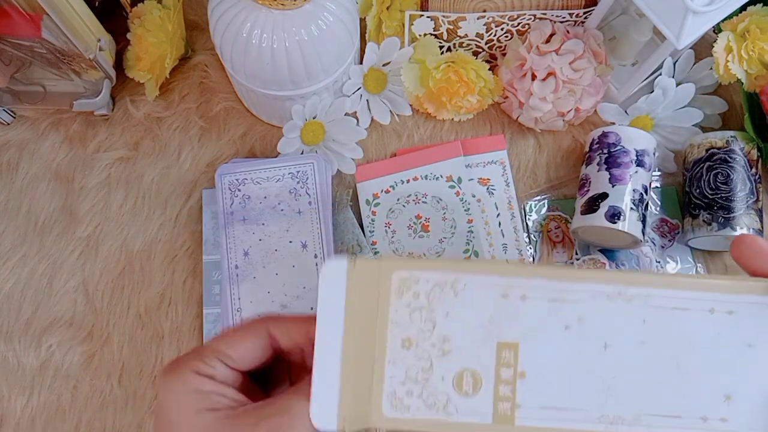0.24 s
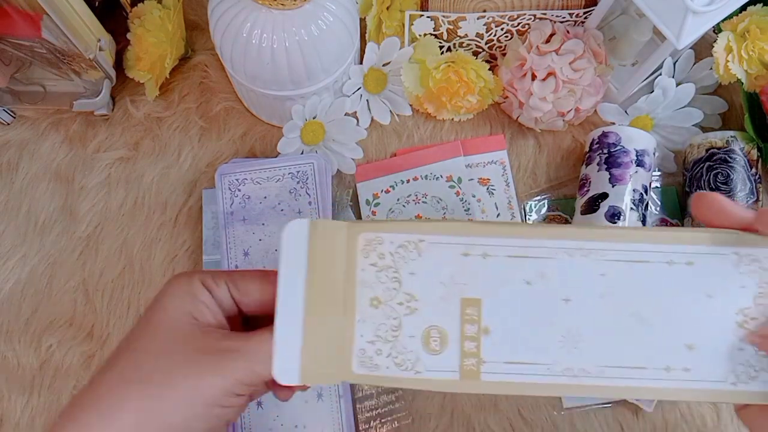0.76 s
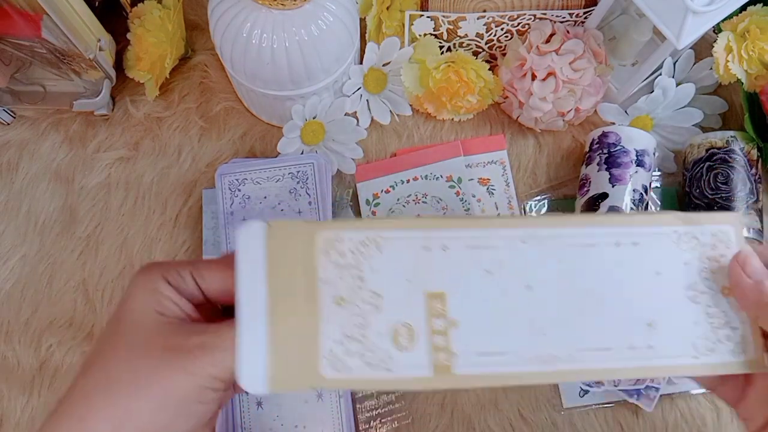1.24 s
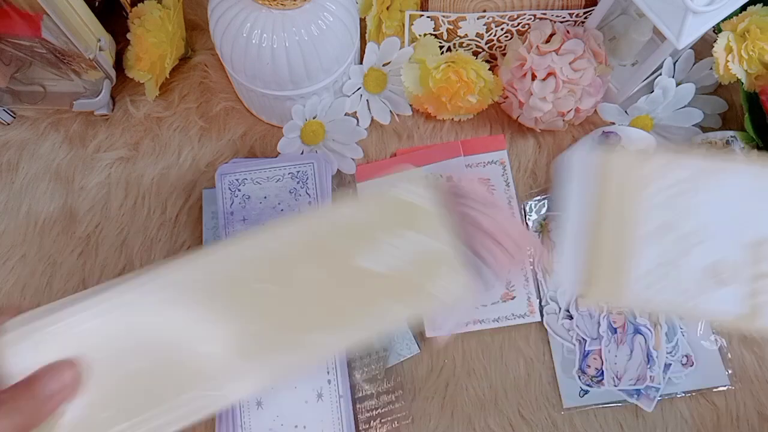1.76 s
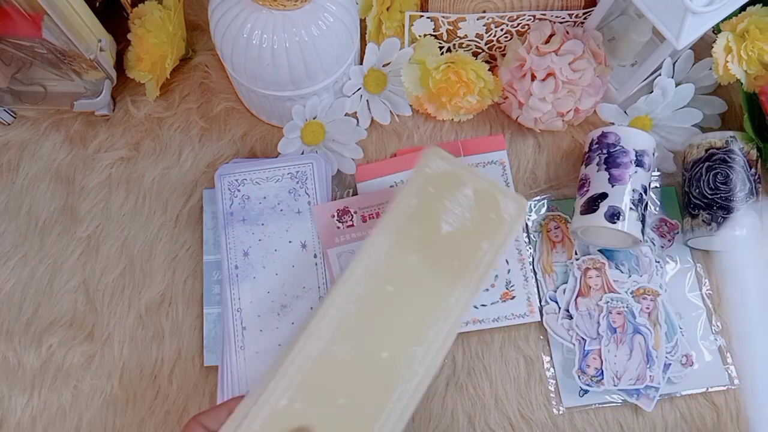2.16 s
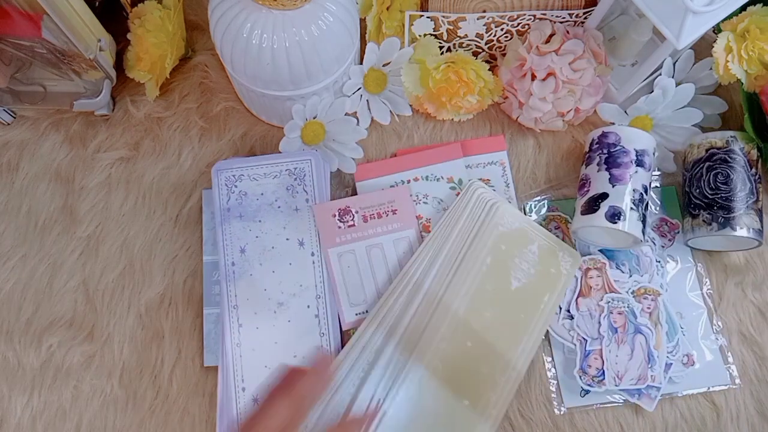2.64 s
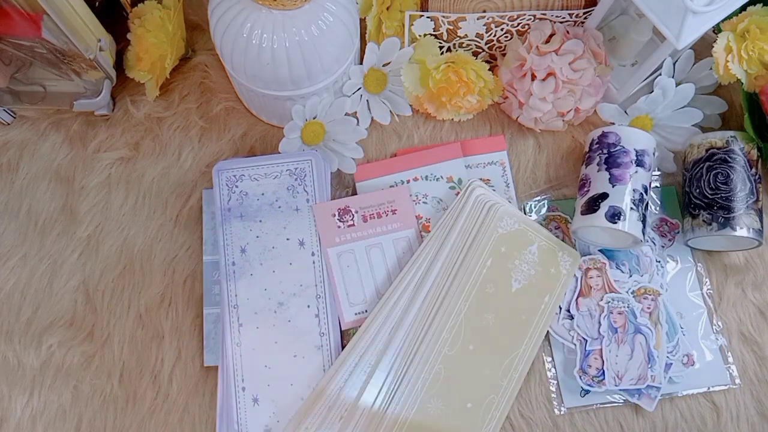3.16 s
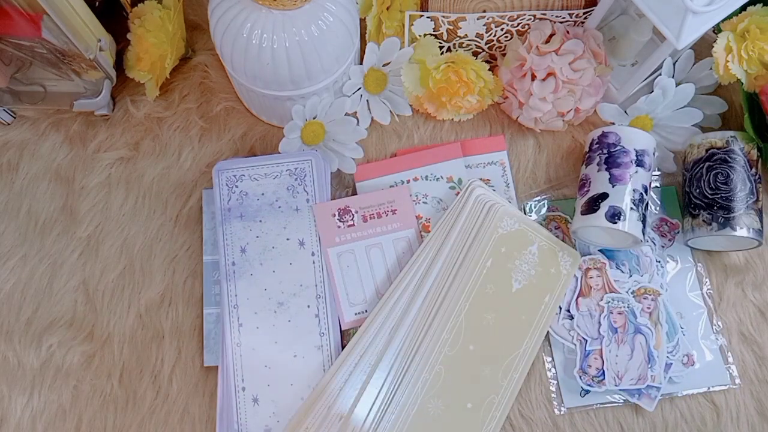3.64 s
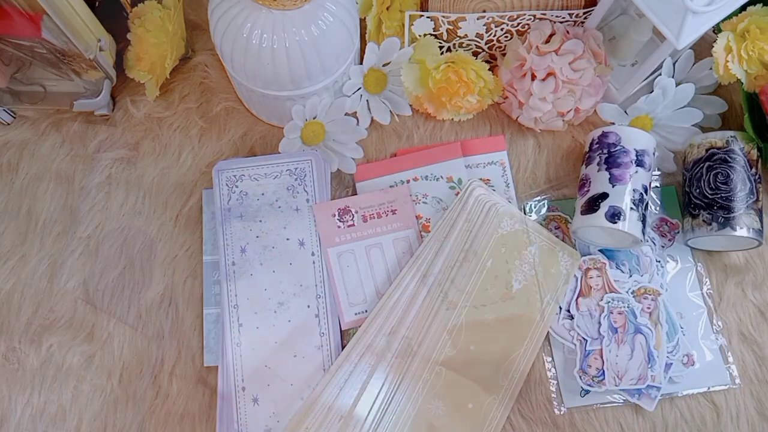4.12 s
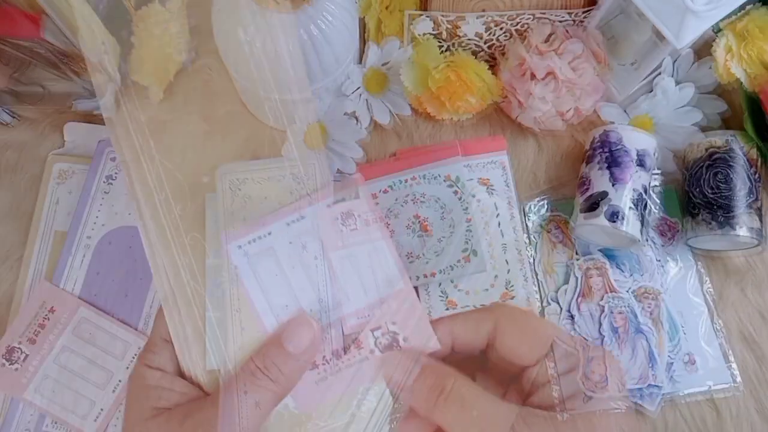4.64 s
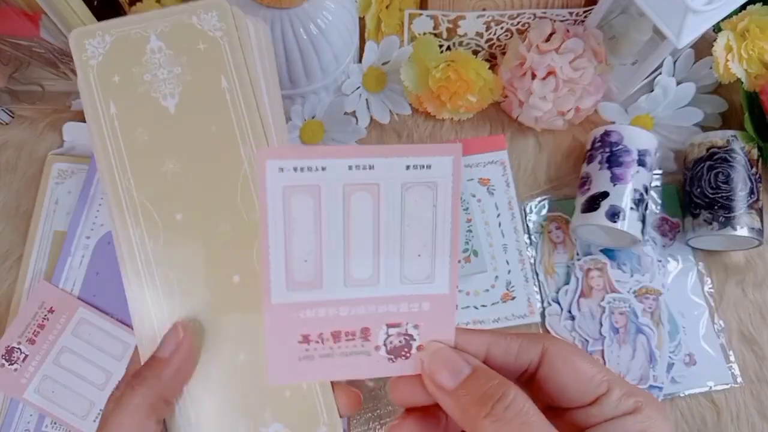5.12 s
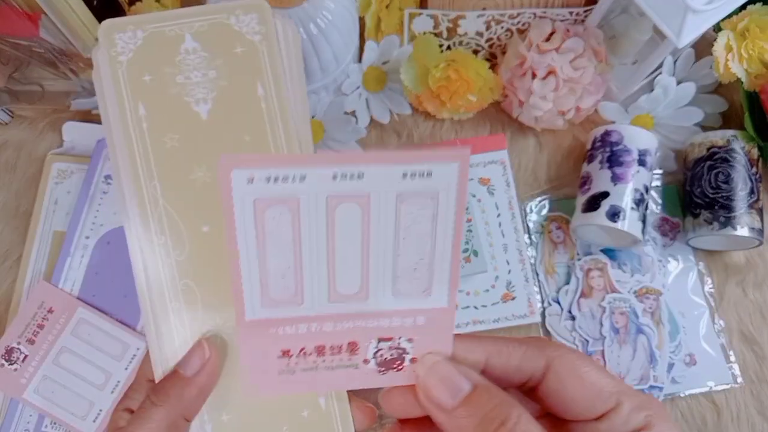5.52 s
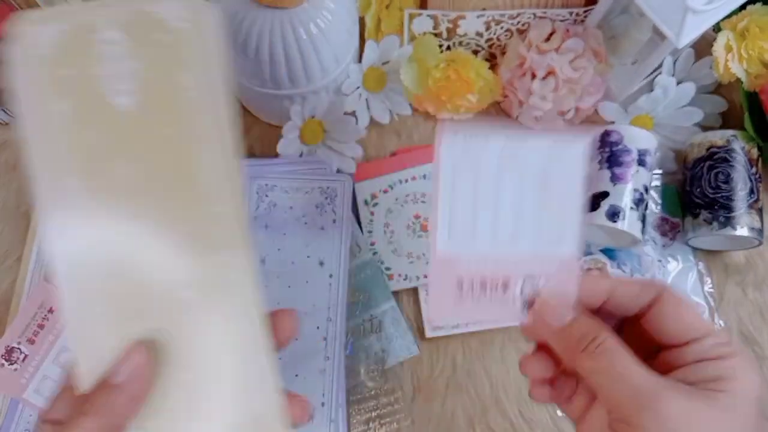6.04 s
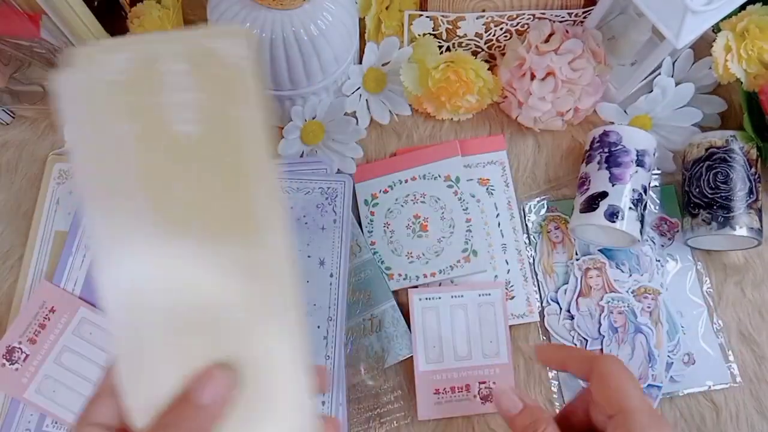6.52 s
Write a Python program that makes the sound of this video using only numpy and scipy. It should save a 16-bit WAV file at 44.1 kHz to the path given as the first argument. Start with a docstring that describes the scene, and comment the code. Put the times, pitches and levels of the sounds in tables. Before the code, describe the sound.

A close, dry handling scene in a small furnished room, over faint steady hiss and low hum. From 0 to 1.3 s fingers work a paper sleeve: short irregular scratchy rubs, crisp snaps near 0.15, 0.4 and 0.7 s, and soft low hand bumps. From 1.3 to 1.9 s the stiff cards are pulled out, the loudest part, with bright rasping strokes, cracks and a chattering edge. From 2 to 2.8 s soft rustles and tiny ticks as the stack is laid down; around 2.9 to 3.2 s a stronger fanning slide with a snap, then small nudges and clicks until 4.4 s. At 4.5 s the sound cuts out briefly, fading back by 4.76 s. Mostly quiet finger rubbing follows, with a dull, padded knock at 5.97 s, faint high ticks near 6.3 s, and quick light taps of the stack from 6.6 to 6.8 s.

```python
"""Cards from a paper sleeve

Close to the microphone, hands open a paper sleeve and draw out a stack of stiff cards, fan it on a cloth and
pick it up again. Faces rub in dense random slips, filtered by paper, card and microphone; edges snap as short
noise cracks. One dull knock, several quick contacts ringing decaying modes, sounds through the small room; taps
on the stack close the scene. Midway the sound cuts out for a moment and fades back in."""
import sys
import numpy as np
from scipy import signal
from scipy.fft import rfft, irfft
from scipy.io import wavfile

SR = 44100
rng = np.random.default_rng(int(sys.argv[2]) if len(sys.argv) > 2 else 0)


def store_wav(level_fs):
    """Save 16-bit WAV to argv[1]."""
    pcm = np.round(np.clip(np.atleast_2d(level_fs), -1, 1) * 32767)
    wavfile.write(sys.argv[1], SR, pcm.T.astype(np.int16))


N = 299439
TIME = np.arange(N) / SR

# Borders between body, rasp, scratch and hiss of the paper. Each entry: frequency in Hz.
RUB_EDGES_HZ = [1100, 3000, 9700]
# Resonances of the stack, with the microphone's own resonance near 8 kHz.
# Each row: frequency in Hz, width in Hz, lift in dB.
STACK_MODES = [(515, 42, 14.4), (810, 66, 1.9), (1330, 95, 2.6), (1954, 91, 4.4), (3450, 140, 3.2),
               (4430, 1100, 6.2), (7890, 550, 12)]
# Strokes as the flap is worked open and the stack is pulled out of the sleeve.
# Each row: start in seconds, length in seconds, level in dB, body and rasp in dB from that level.
SLEEVE_STROKES = [(0.011, 0.024, -39.5, -20, -11), (0.077, 0.044, -38, -9.5, -6.5),
                  (0.149, 0.053, -34.5, -5.5, 2), (0.236, 0.063, -48, -18, -11.5),
                  (0.299, 0.054, -39.5, -10, -9), (0.386, 0.029, -28.5, -8.5, -1.5),
                  (0.453, 0.061, -45, -20, -4.5), (0.546, 0.028, -37.5, -9.5, -4),
                  (0.599, 0.06, -35, -13, -1.5), (0.653, 0.15, -43.5, -19, -2.5),
                  (0.804, 0.054, -45.5, -8, -2), (0.908, 0.054, -32, -7.5, -4.5),
                  (0.972, 0.1, -41, -9.5, 0.5), (1.087, 0.058, -33, -29, -14.5),
                  (1.169, 0.091, -34.5, -24, -6.5), (1.226, 0.033, -32.5, -34.5, -35),
                  (1.323, 0.049, -23, -11.5, -1.5), (1.388, 0.07, -18.5, -18, -5.5),
                  (1.46, 0.067, -26, -27, 0), (1.57, 0.065, -28.5, -29.5, -0.5),
                  (1.679, 0.044, -33, -10, -1), (1.709, 0.067, -22.5, -22.5, -3.5),
                  (1.779, 0.02, -20.5, -20, -2), (1.841, 0.1, -42, -16.5, -7.5),
                  (1.924, 0.068, -35.5, -2, -2)]
# Strokes as the stack is laid down, fanned out and nudged.
# Each row: start in seconds, length in seconds, level in dB, body and rasp in dB from that level.
STACK_STROKES = [(2.071, 0.071, -43.0, -17, -4.5), (2.198, 0.05, -43.5, -17, 2),
                 (2.296, 0.073, -42.5, -40, -16), (2.371, 0.051, -41.5, -35, -4),
                 (2.46, 0.064, -44, -35, -7.5), (2.526, 0.055, -39.5, -24, -12),
                 (2.599, 0.077, -38, -13.5, -10.5), (2.675, 0.1, -57.5, -10, -19),
                 (2.796, 0.068, -55.5, -14.5, 1), (2.903, 0.096, -34, -15, -2.5),
                 (2.99, 0.054, -26, -10, 0), (3.093, 0.04, -25, -12.5, -2),
                 (3.143, 0.15, -33.5, -15.5, -7.0), (3.227, 0.054, -40, -5, 6), (3.276, 0.11, -53.5, -5, 2),
                 (3.408, 0.013, -43, -3, 4), (3.464, 0.061, -43, 0, 1.5), (3.559, 0.037, -47, -1, -2.5),
                 (3.642, 0.078, -45.5, -5.5, 2.5), (3.771, 0.029, -41, -20, 4.5),
                 (3.879, 0.065, -33.5, -22.5, -5.5), (3.95, 0.036, -28.5, -12, -6),
                 (4.025, 0.064, -41.5, -40, -25), (4.097, 0.17, -47.5, -19, -19),
                 (4.337, 0.12, -40, -28, -11), (4.478, 0.01, -40.5, -5, -6)]


def sleeve_rub():
    """Stiff cards rub inside the paper sleeve; sleeve and microphone resonances colour the slips."""
    # Friction colour of the sleeve. Each row: frequency in Hz, density in dB per Hz.
    sleeve_colour = [(88, -62.5), (150, -29.5), (297, -11.5), (647, -1), (974, -14), (1230, -8.5),
                     (2080, -1), (2390, 3), (2900, -6), (3880, -2.5), (6450, -8.5), (8150, -12),
                     (11100, -13.5), (15800, -15)]
    # Resonances of the sleeve, with the microphone's own resonance near 8 kHz.
    # Each row: frequency in Hz, width in Hz, lift in dB.
    sleeve_modes = [(654, 73, -5), (1350, 180, 4.5), (1700, 230, 3), (2200, 370, -3), (3213, 35, 7),
                    (3800, 180, -0.5), (7960, 800, 14)]
    return rub(SLEEVE_STROKES, sleeve_colour, sleeve_modes, slips_per_s=3200, spread_db=-1.5,
               smooth_db=-0.5, judder_db=1.73, hiss_db=1.5)


def stack_rub():
    """Card faces slide over one another; stack and microphone resonances colour the slips."""
    # Friction colour of card on card. Each row: frequency in Hz, density in dB per Hz.
    stack_colour = [(88, -103), (150, -91), (226, -5), (413, -17), (543, -17), (660, -3), (1050, -2.5),
                    (1930, 4.5), (2120, 2), (2480, 1.5), (6450, 4), (7990, 3.5), (9520, 3.5), (15800, 4)]
    return rub(STACK_STROKES, stack_colour, STACK_MODES, slips_per_s=2500, spread_db=-0.5,
               smooth_db=4.5, judder_db=1.5, hiss_db=4.0)


def finger_rub():
    """Fingers slide over the cards they hold: smoother friction through the same resonances as the stack."""
    # Strokes of the fingers.
    # Each row: start in seconds, length in seconds, level in dB, body and rasp in dB from that level.
    finger_strokes = [(4.647, 0.081, -46.5, -16, -16), (4.781, 0.038, -33, -45, -18),
                      (4.876, 0.12, -45, -33, -20), (5.039, 0.13, -64, -7.5, -9),
                      (5.636, 0.17, -63.5, -7, -8.5), (5.805, 0.09, -52, -17.0, -15),
                      (5.882, 0.063, -48, -23, -14), (5.983, 0.129, -50.5, -13.0, -9.5),
                      (6.158, 0.33, -53, -23, -13.5), (6.424, 0.065, -43.5, -0.5, -2),
                      (6.483, 0.18, -50.5, -21, -19), (6.616, 0.38, -48.5, -17.5, -8)]
    # Friction colour of the fingers. Each row: frequency in Hz, density in dB per Hz.
    finger_colour = [(180, -38.5), (300, -27), (633, -18.5), (759, -4), (882, -13), (1110, -5.5),
                     (1430, -10.5), (2910, -9), (3610, -5.5), (6240, 5.5), (8140, 8.5), (15800, 28)]
    return rub(finger_strokes, finger_colour, STACK_MODES, slips_per_s=1900, spread_db=-7.0,
               smooth_db=6.0, judder_db=2.5, hiss_db=-1)


def rub(strokes, spectrum, modes, slips_per_s, spread_db, smooth_db, judder_db, hiss_db):
    """Paper fibres catch and slip with juddering pressure; the slips excite the resonances."""
    sizes = from_db(spread_db * np.minimum(rng.exponential(1, N), 4)) * rng.choice([-1, 1], N)
    slips = rms_one(sizes * (rng.random(N) < slips_per_s / SR))
    # coarse fibres catch now and then, rarer than the fine slips
    catches_per_s, catch_db = 110, -9
    catches = rms_one(rng.standard_normal(N) * (rng.random(N) < catches_per_s / SR))
    smooth = from_db(smooth_db) * rng.standard_normal(N)
    judder = from_db(judder_db * drift(31))
    friction = (slips + from_db(catch_db) * catches + smooth) * judder
    sound = colour(friction, spectrum)
    for hz, width_hz, lift_db in modes:
        sound = sound + (from_db(lift_db) - 1) * resonate(sound, hz, width_hz)
    sound = flexing(sound, low_hz=410.3, high_hz=5793, sharpness=17, lift_db=1.0, shift_db=11.0)
    registers = split(sound, RUB_EDGES_HZ)
    body, rasp, scratch, hiss = [band * gain for band, gain in zip(registers, stroke_levels(strokes))]
    return body + rasp + scratch + from_db(hiss_db) * hiss


def flexing(sound, low_hz, high_hz, sharpness, lift_db, shift_db, count=18):
    """As the grip shifts and the card bends, its narrow plate modes come and go."""
    pitches = np.geomspace(low_hz, high_hz, count) * np.exp(rng.normal(0, .03, count))
    flexed = sound
    for hz in pitches:
        lift = from_db(lift_db + shift_db * np.tanh(drift(3.9)))
        flexed = flexed + resonate(sound, hz, hz / sharpness) * (lift - 1)
    return flexed


def stroke_levels(strokes):
    """Gains of body, rasp, scratch and hiss: each stroke rises, swells to its middle and dies away."""
    attack_s, attack_share = 0.013, 0.6   # a longer stroke gets going more slowly
    swell_db, release_s = 3.5, 0.024
    # a stroke with less rasp has more hiss (dB per dB)
    base_hiss_db, hiss_loss_per_rasp = -9.5, .25
    t, power = TIME[::64], 0
    for start_s, length_s, db, body_db, rasp_db in strokes:
        age = t - start_s
        attack = np.clip(.5 + age / (attack_s + attack_share * length_s), 0, 1)
        swell = from_db(-swell_db * (2 * np.clip(age / length_s, 0, 1) - 1) ** 2)
        release = np.exp(-np.maximum(age - length_s, 0) / release_s)
        stroke_hiss_db = base_hiss_db - hiss_loss_per_rasp * rasp_db
        registers = from_db(db + np.array([body_db, rasp_db, 0, stroke_hiss_db]))
        power = power + np.outer(registers, attack * swell * release) ** 2
    return [np.interp(TIME, t, np.sqrt(p)) for p in power]


def snaps():
    """A bent edge drags, then lets go: a crack of a millisecond, a ring with a high zing, a faint flutter."""
    # Snaps and taps of flaps and card edges. Each row: time in seconds, level in dB before the common level,
    # ring in Hz, body in dB and crispness in dB, both against the rasp.
    edge_snaps = [(0.0819, -25, 5000, 2, 19), (0.1558, -6, 1240, -6, -5.5), (0.1698, -21, 4330, 0, 15),
                  (0.1771, -12.5, 4170, 0.5, 10), (0.1985, -24.5, 4100, -1, 10),
                  (0.398, -21, 2120, -9, -17), (0.402, -10, 2200, -7.5, -5),
                  (0.5536, -22.5, 2070, -5.5, -3), (0.6511, -24, 2090, -14, 5), (0.7137, -8.5, 2510, -9, 0),
                  (0.8196, -14, 1400, -11.5, 0.5), (0.9668, -15, 2030, -9.5, -4.5),
                  (1.3554, -13, 1240, -14.5, -9), (1.3879, -10.5, 1270, -4.5, 0), (1.4, -11, 1880, -37, -4),
                  (1.7917, -21.5, 2375, -43, -16.5), (1.7982, -11.5, 2360, -38.5, 5),
                  (2.2124, -31, 1940, -24, -7), (2.307, -32, 3030, -6, 15.5), (2.3604, -30, 2570, -1, 20),
                  (2.604, -33, 4440, -4, 12), (2.8223, -24.5, 2440, -28, -7.5),
                  (2.9101, -26.5, 1960, -10, 0.5), (2.958, -13, 4530, -2.5, 3), (3.414, -36, 1920, -21, -3),
                  (3.4288, -30.5, 1680, -5.5, 3.5), (3.7478, -28, 2570, -5, 1),
                  (3.8555, -34, 3650, -11.5, -1), (4.4833, -34.5, 1350, -4, 4),
                  (4.7971, -33.5, 4573, -6.5, 29.5), (6.4917, -31, 3620, -11, 12)]
    # Light ticks of card corners slipping off one another.
    # Each row: time in seconds, level in dB before the common level.
    corner_ticks = [(0.109, -32), (0.5417, -38), (0.758, -31), (1.9228, -30.5), (2.3354, -41.5),
                    (4.323, -40), (4.759, -44), (6.431, -34)]
    # Colour of a snap. Each row: frequency in Hz, density in dB per Hz.
    snap_colour = [(40, -38), (160, -12.5), (290, -11), (500, -0.5), (1200, -2), (2500, -1), (4500, 2.5),
                   (6800, -2.5), (8200, -1), (9800, -6.5), (13000, -12.5), (16000, -22)]
    level_db = -12.5   # common to snaps and ticks
    drag_db, drag_s = -19, 0.0021
    crack_s, flutter_s, flutter_db = .0012, 0.007, -17
    ring_width_hz, ring_db = 240, 7.5
    zing_hz, zing_width_hz, zing_db = 8160, 350, 6.5
    lead = SR // 64   # samples of drag ahead of the release
    out, t = np.zeros(N + SR), TIME[:SR // 16] - lead / SR
    drag = from_db(drag_db) * np.exp(-abs(t) / drag_s)
    # the crack dies fast, the loose edge flutters a little longer
    release = np.exp(-abs(t) / crack_s) + from_db(flutter_db) * np.exp(-abs(t) / flutter_s)
    # all ticks are thin and crisp: ring 8200 Hz, body -0.5 dB, crispness 16 dB
    ticks = [(s, db, 8200, -0.5, 16) for s, db in corner_ticks]
    for s, db, hz, body_db, crisp_db in list(edge_snaps) + ticks:
        crack = colour(rng.standard_normal(len(t)) * np.where(t < 0, drag, release), snap_colour)
        crack = crack + from_db(ring_db) * resonate(crack, hz, ring_width_hz) \
            + from_db(zing_db) * resonate(crack, zing_hz, zing_width_hz)
        body, rasp, crisp = split(crack, RUB_EDGES_HZ[:2])
        snap = rms_one(from_db(body_db) * body + rasp + from_db(crisp_db) * crisp)
        at = max(round(s * SR) - lead, 0)
        out[at:at + len(t)] += from_db(db + level_db) * snap
    return out[:N]


def chatters(slips_per_s, sharpness):
    """A sliding edge catches in quick slips that keep one bending mode ringing."""
    # A card catching and chattering.
    # Each row: middle in seconds, length (Gaussian spread) in seconds, mode in Hz, level in dB.
    card_chatters = [(0.414, 0.022, 7800, -46.5), (1.736, 0.024, 2320, -24.5), (1.795, 0.011, 3850, -24.5),
                     (1.796, 0.0051, 2390, -19.5), (2.12, 0.039, 1720, -50), (2.824, 0.0013, 2560, -25),
                     (3.02, 0.042, 2510, -33.5), (3.496, 0.014, 3240, -39.5), (3.52, 0.017, 1194, -41),
                     (3.708, 0.0072, 1184, -38.5), (3.796, 0.011, 1675, -30), (3.798, 0.014, 535, -45.5),
                     (3.906, 0.018, 4280, -35), (4.08, 0.049, 4300, -50), (6.26, 0.0033, 8070, -43.5),
                     (6.302, 0.0031, 8100, -41), (6.332, 0.0033, 8140, -45), (6.384, 0.0046, 8100, -40)]
    out = np.zeros(N)
    for s, length_s, hz, db in card_chatters:
        near = abs(TIME - s) < .25
        slips = rng.standard_normal(near.sum()) * (rng.random(near.sum()) < slips_per_s / SR)
        width_hz = hz / sharpness
        tone = rms_one(resonate(resonate(slips, hz, width_hz), hz, width_hz))
        out[near] += tone * from_db(db) * np.exp(-.5 * ((TIME[near] - s) / length_s) ** 2)
    return out


def closing_taps():
    """The held stack is tapped square: each contact rings its short modes and scuffs."""
    # Taps of the stack. Each row: time in seconds, level in dB before the common level.
    tap_contacts = [(6.6192, -8), (6.7060, -4), (6.7311, -1.5), (6.7690, -1)]
    # What the taps ring with. Each row: frequency in Hz, level in dB before the tap's, t60 in seconds.
    tap_modes = [(792, 2.5, 0.033), (896, -7, .05), (1080, 0, 0.032), (1248, 5, 0.03), (1670, 1.5, 0.024),
                 (2380, -19, 0.19), (3470, -26, 0.033), (4500, -24, 0.037), (7700, -14, .02),
                 (8200, -9, .02), (8240, 9.5, 0.013)]
    return strike(tap_contacts, tap_modes, level_db=-31.5, scuff_db=0.5, scuff_s=0.0052, low_cut_hz=480)


def knock(soft_hz):
    """A padded bump: several contacts in quick succession, with no treble."""
    # Contacts of the dull knock. Each row: time in seconds, level in dB before the common level.
    knock_contacts = [(5.9640, -8), (5.9655, -6.5), (5.9692, -1), (5.9712, -1.5), (5.9768, -10),
                      (5.9805, -18)]
    # What the knock rings with. Each row: frequency in Hz, level in dB before the contact's, t60 in seconds.
    knock_modes = [(235, -16, 0.088), (331, -3.5, 0.12), (488.4, -3, 0.13), (560, -8, 0.072),
                   (642, 8.5, 0.049), (757, 2.5, 0.1), (930, -4, 0.066), (1203, 2, 0.091),
                   (1350, 1.5, 0.024), (1680, 5.5, 0.039), (2080, 0.5, 0.026), (2830, -15, 0.031),
                   (3500, -14, 0.033)]
    hard = strike(knock_contacts, knock_modes, level_db=-26, scuff_db=14, scuff_s=0.0011, low_cut_hz=190)
    return butter(hard, soft_hz, "low", order=8)


def soft_bumps():
    """The stack bumps softly against the hand or the cloth and rings a few low modes."""
    # Bumps of the stack. Each row: time in seconds, level in dB before the common level.
    bump_contacts = [(0.158, -7), (1.386, -5.5), (2.956, -9), (3.95, -10), (4.318, -15)]
    # What a bump rings with. Each row: frequency in Hz, level in dB before the bump's, t60 in seconds.
    bump_modes = [(135, -7.5, .12), (174, -2, 0.055), (233, 4.5, 0.11), (262, -3, .07)]
    return strike(bump_contacts, bump_modes, level_db=-35.5, scuff_db=-14, scuff_s=0.002, low_cut_hz=100)


def strike(contacts, modes, level_db, scuff_db, scuff_s, low_cut_hz):
    """Each contact rings the same modes with slightly different strengths and adds a short scuff."""
    out, t = np.zeros(N + SR), TIME[:SR // 4]
    for s, db in contacts:
        # neighbouring modes start with opposite signs
        strengths = (-1) ** np.arange(len(modes)) * from_db(rng.normal(0, 1, len(modes)))
        ring = np.zeros(len(t))
        for strength, (hz, mode_db, t60) in zip(strengths, modes):
            ring += strength * from_db(mode_db - 60 * t / t60) * np.sin(2 * np.pi * hz * t)
        scuff = rng.standard_normal(len(t)) * np.exp(-t / scuff_s)
        at = round(s * SR)
        out[at:at + len(t)] += from_db(db + level_db) * (ring + from_db(scuff_db) * scuff)
    return butter(out[:N], low_cut_hz, "high", order=4)


def near_echoes(x):
    """Reflections within a millisecond or so give the paper a slightly hollow ripple."""
    # Echoes from things right beside the microphone. Each row: delay in ms, signed gain.
    close_echoes = [(0.92, 0.052), (1.122, -0.079)]
    return x + sum(gain * np.interp(TIME - ms / 1000, TIME, x, left=0) for ms, gain in close_echoes)


def room(x, wet_db, dull_hz):
    """Diffuse reflections of a small furnished room: a decaying noise tail, duller than the source."""
    room_t60_s = 0.096
    t = TIME[:SR // 2]
    tail = butter(rng.standard_normal(len(t)), dull_hz, "low", order=1)
    tail = tail * from_db(-60 * t / room_t60_s) * (t > .004)
    return x + from_db(wet_db) * signal.fftconvolve(x, tail / np.linalg.norm(tail))[:N]


def background(hand_db, tone_db):
    """Steady room tone, microphone hiss and mains hum, with low hand thuds that follow the card strokes."""
    # Room tone and microphone hiss. Each row: frequency in Hz, density in dB per Hz.
    room_tone = [(30, -30), (59, -17), (86, -20.5), (120, -18), (230, -7), (470, -7), (800, -14),
                 (1750, -16), (3500, -22), (6800, -25), (8000, -11), (9200, -24), (12000, -16),
                 (15500, -12.5)]
    tone = from_db(tone_db) * rms_one(colour(rng.standard_normal(N), room_tone))
    thuds = butter(rng.standard_normal(N), [115, 270], "band", order=4)
    thuds = thuds + 2.5 * resonate(thuds, 130, 18) + 1.5 * resonate(thuds, 320, 25)
    lumps = from_db(3 * np.tanh(drift(8)))
    # the hands thud more as they press harder (dB per dB of the strokes' body)
    thud_follows = 0.46
    pressure = stroke_levels(list(SLEEVE_STROKES) + list(STACK_STROKES))[0]
    hands = rms_one(thuds * lumps) * from_db(hand_db) * pressure ** thud_follows
    hum_hz, hum_db = 120, -77.5   # level as RMS
    hum = from_db(hum_db) * np.sqrt(2) * np.sin(2 * np.pi * hum_hz * TIME)
    return tone + hum + hands


def from_db(db):
    """Decibels to gain."""
    return 10 ** (np.asarray(db) / 20)


def rms_one(x):
    """Scale to unit power."""
    return x / np.sqrt(np.mean(x ** 2) + 1e-20)


def butter(x, hz, kind, order=2):
    """Causal Butterworth filter."""
    return signal.sosfilt(signal.butter(order, hz, kind, fs=SR, output="sos"), x + 1e-18)


def drift(hz):
    """Slow random wander of spread 1, drawn at a low rate and interpolated."""
    step = 32   # samples per drawn point
    noise = rng.standard_normal((N + SR) // step + 2)
    # the filter settles before the part that is kept
    slow = rms_one(butter(noise, min(hz * step, SR / 4), "low")[SR // step:])
    return np.interp(np.arange(N) / step, np.arange(len(slow)), slow)


def colour(x, spectrum):
    """Causal (minimum-phase) filter that follows a short spectrum."""
    hz, db = np.transpose(spectrum)
    grid = np.linspace(1, SR / 2, 2049)
    cepstrum = irfft(np.log(from_db(np.interp(np.log(grid), np.log(hz), db))))
    # folding the cepstrum onto its first half makes the filter causal
    cepstrum[1:len(grid) - 1] *= 2
    cepstrum[len(grid):] = 0
    return signal.fftconvolve(x, irfft(np.exp(rfft(cepstrum))))[:len(x)]


def resonate(x, hz, width_hz):
    """Resonance with gain 1 at its top."""
    r = np.exp(-np.pi * width_hz / SR)
    feed = np.array([1, 0, -1]) * (1 - r * r) / 2
    return signal.lfilter(feed, [1, -2 * r * np.cos(2 * np.pi * hz / SR), r * r], x + 1e-18)


def split(x, edges_hz):
    """Cut a sound into neighbouring registers, each of unit power."""
    low = butter(x, edges_hz[0], "low", order=4)
    middle = [butter(x, pair, "band", order=4) for pair in zip(edges_hz, edges_hz[1:])]
    high = butter(x, edges_hz[-1], "high", order=4)
    return [rms_one(band) for band in [low, *middle, high]]


def scene():
    """Sleeve, stack and fingers in turn, with their snaps and bumps, the knock and the closing taps."""
    rubbing = sleeve_rub() + stack_rub() + finger_rub()
    edges = snaps() + chatters(slips_per_s=500, sharpness=9.7)
    paper = room(near_echoes(rubbing + edges + closing_taps()), wet_db=-18.5, dull_hz=6900)
    knocking = room(knock(soft_hz=3400), wet_db=-13.0, dull_hz=2980)
    return (paper + soft_bumps() + knocking + background(hand_db=-40, tone_db=-53.5))[None]


def record(dry):
    """The sound cuts out and fades back in; peaks past full scale are clipped and the top is cut."""
    cut_s, back_s, full_s = 4.497, 4.54, 4.76
    fade = np.where(TIME < cut_s, 1, np.clip((TIME - back_s) / (full_s - back_s), 0, 1))
    loud = np.clip(dry * fade, -1, 1)
    cutoff_hz = 15900
    return signal.sosfilt(signal.ellip(12, .2, 80, cutoff_hz, fs=SR, output="sos"), loud)


dry = scene()
out = record(dry)
store_wav(out)
```